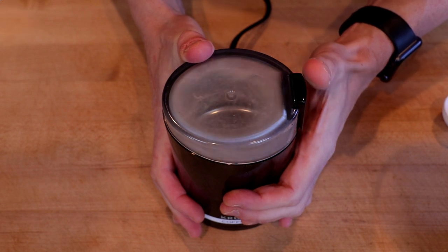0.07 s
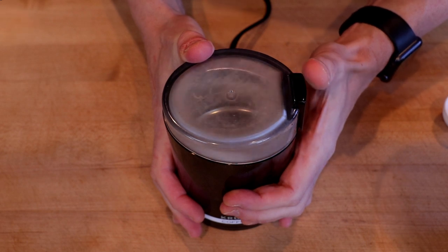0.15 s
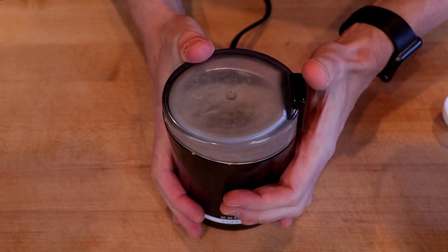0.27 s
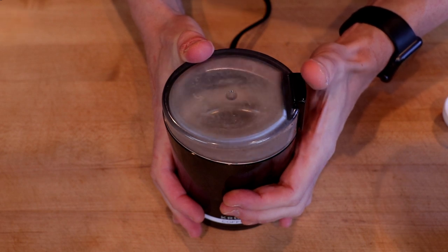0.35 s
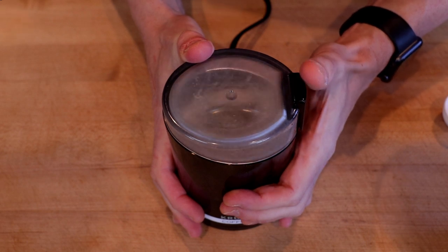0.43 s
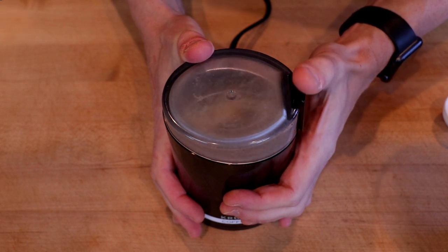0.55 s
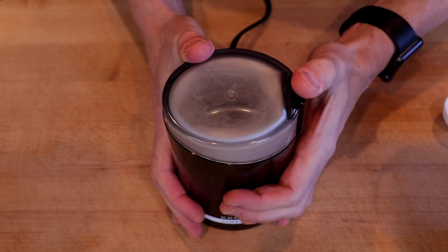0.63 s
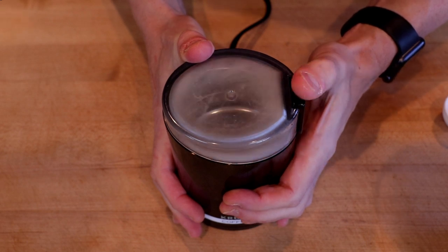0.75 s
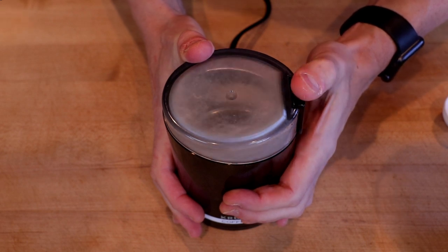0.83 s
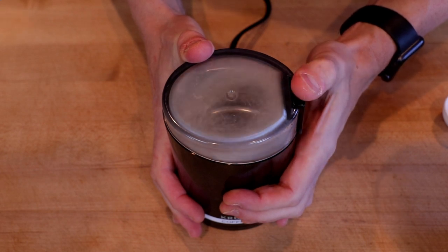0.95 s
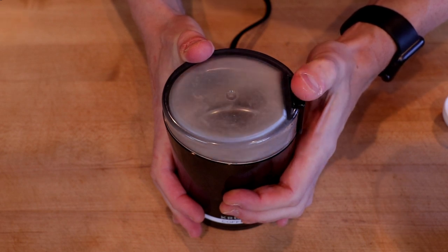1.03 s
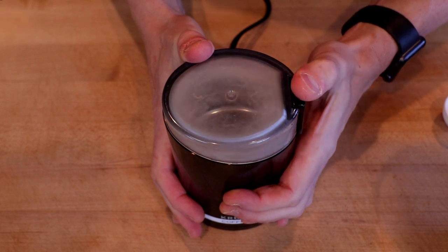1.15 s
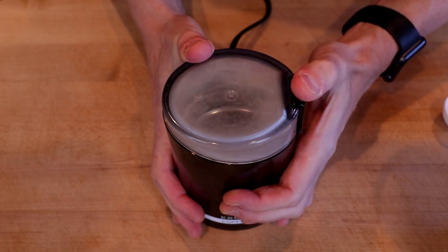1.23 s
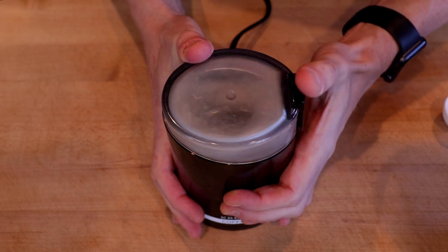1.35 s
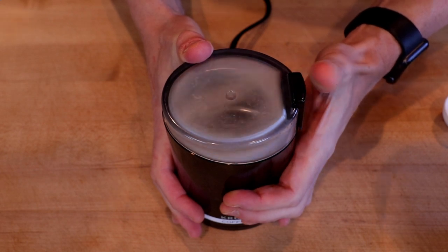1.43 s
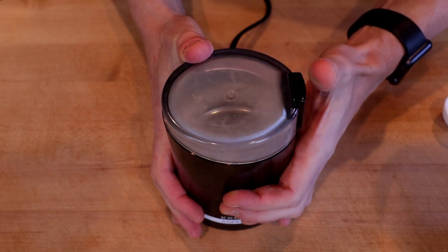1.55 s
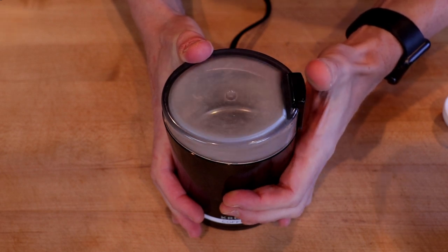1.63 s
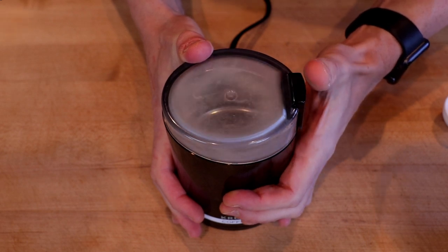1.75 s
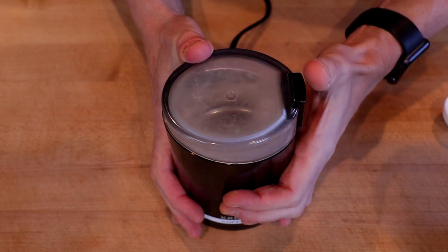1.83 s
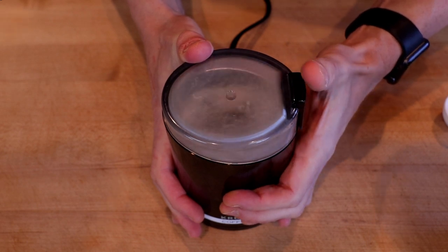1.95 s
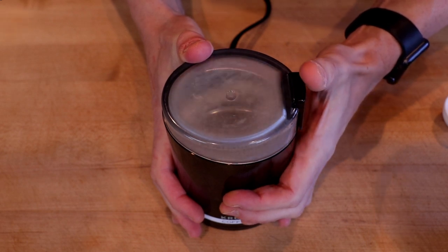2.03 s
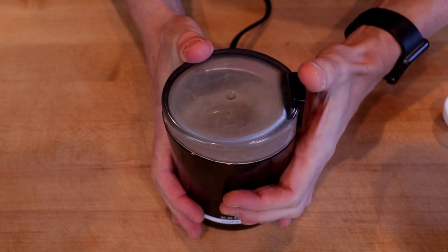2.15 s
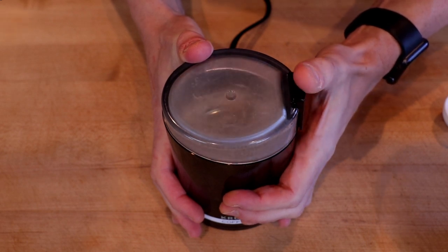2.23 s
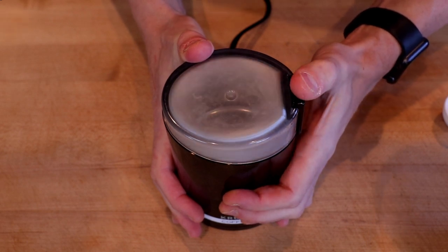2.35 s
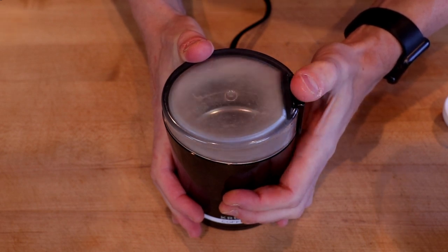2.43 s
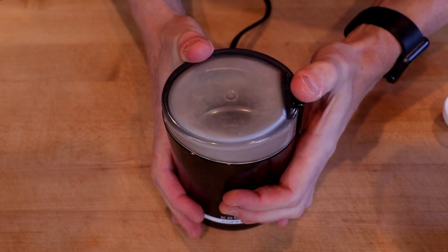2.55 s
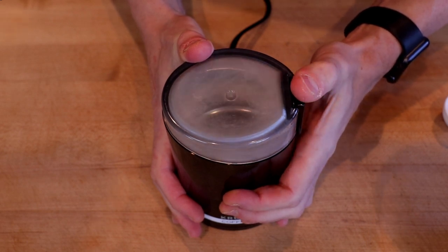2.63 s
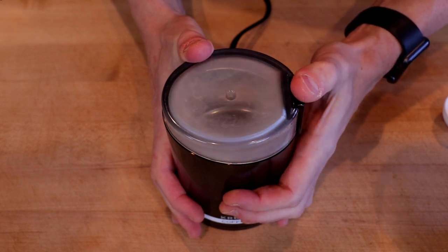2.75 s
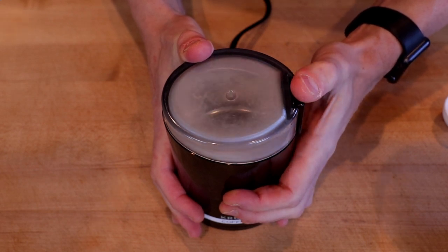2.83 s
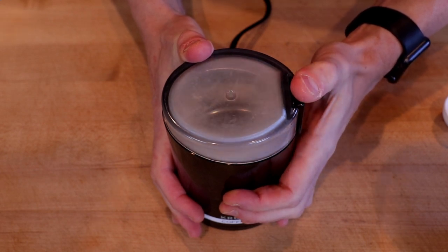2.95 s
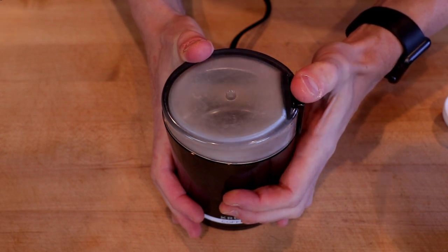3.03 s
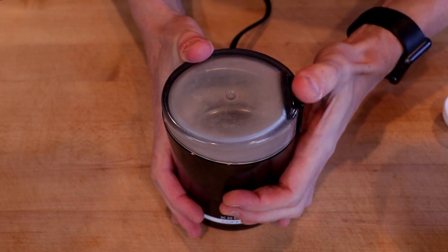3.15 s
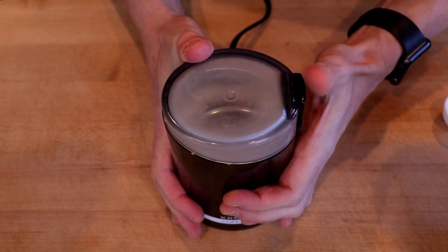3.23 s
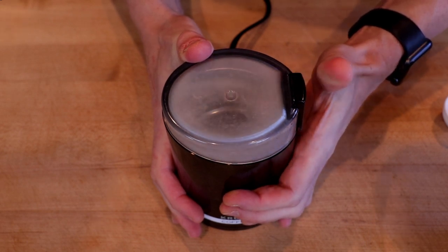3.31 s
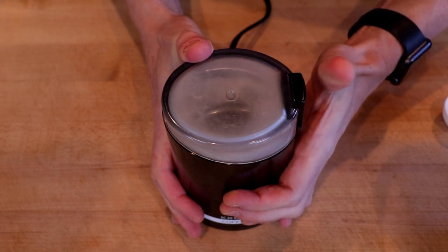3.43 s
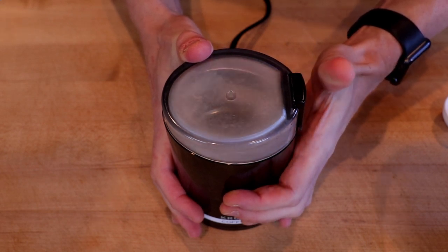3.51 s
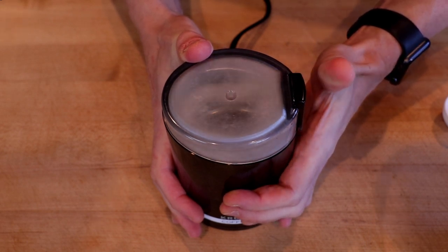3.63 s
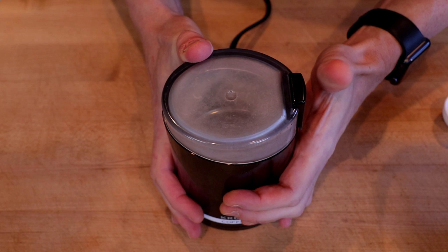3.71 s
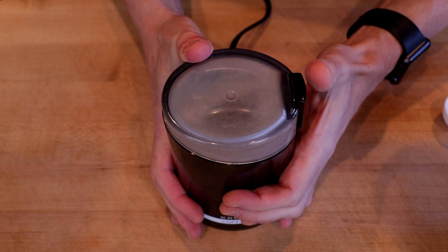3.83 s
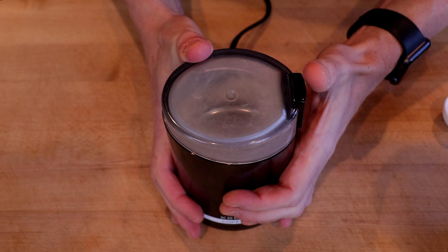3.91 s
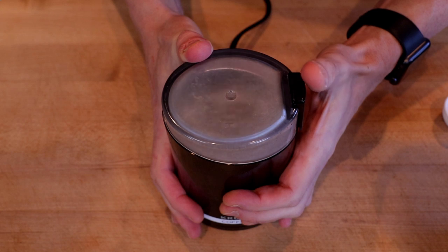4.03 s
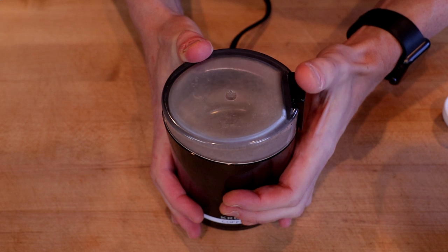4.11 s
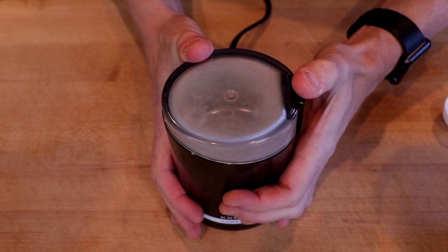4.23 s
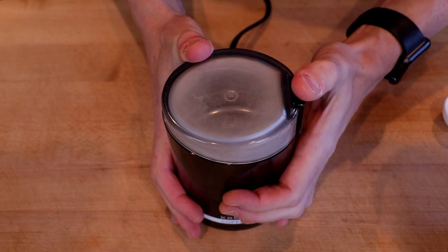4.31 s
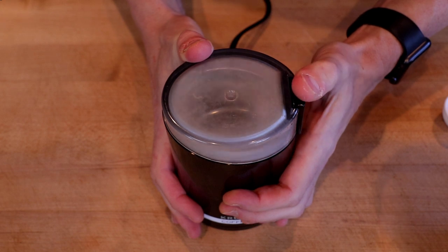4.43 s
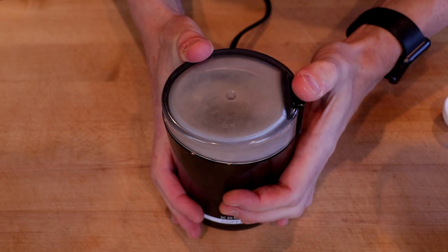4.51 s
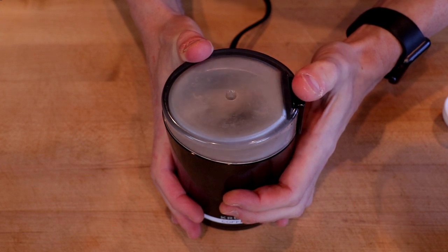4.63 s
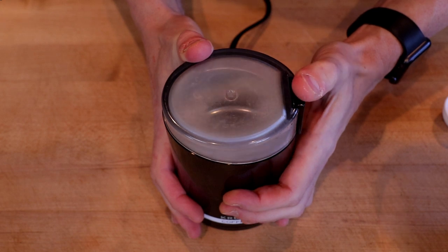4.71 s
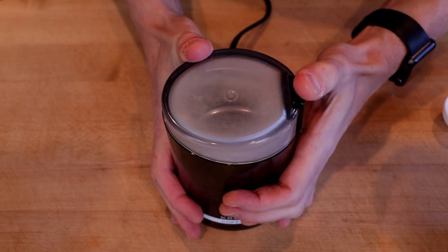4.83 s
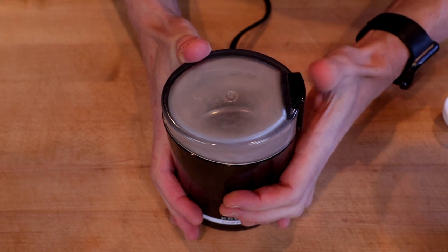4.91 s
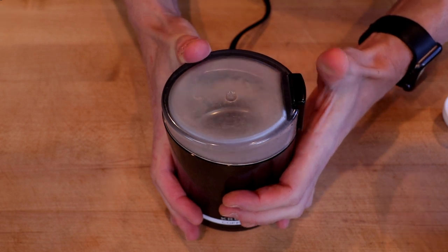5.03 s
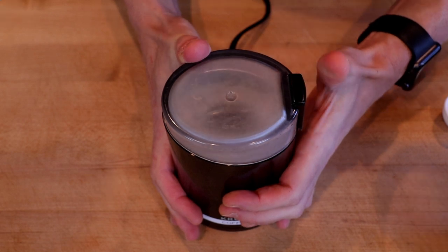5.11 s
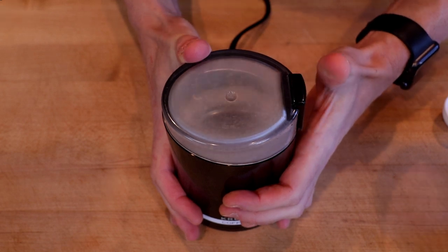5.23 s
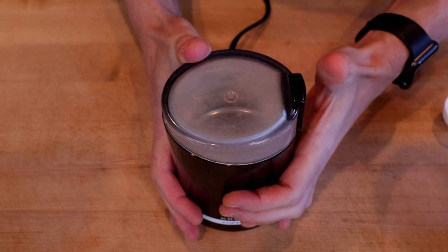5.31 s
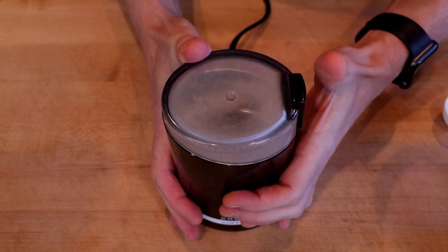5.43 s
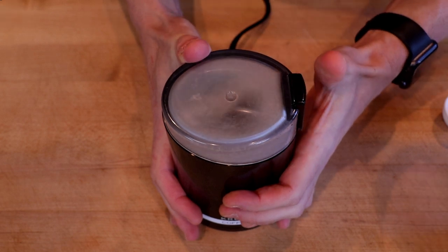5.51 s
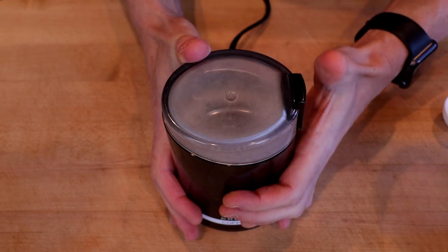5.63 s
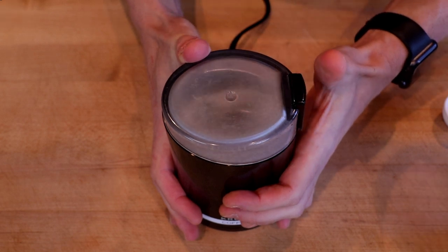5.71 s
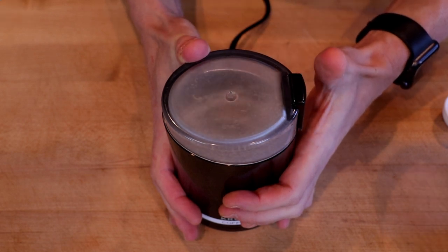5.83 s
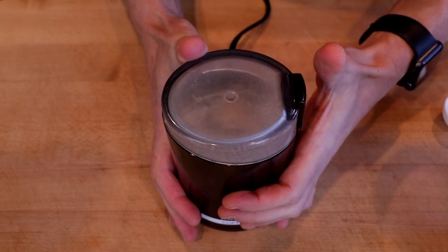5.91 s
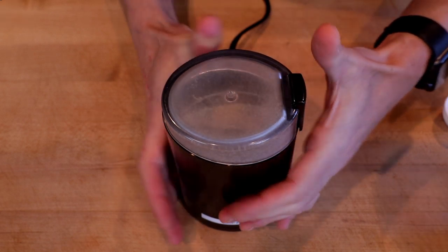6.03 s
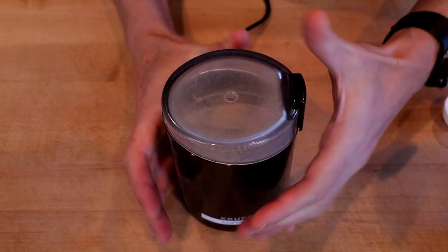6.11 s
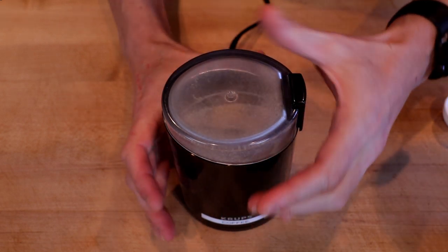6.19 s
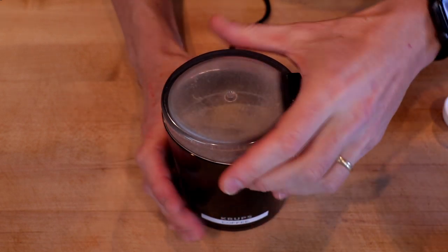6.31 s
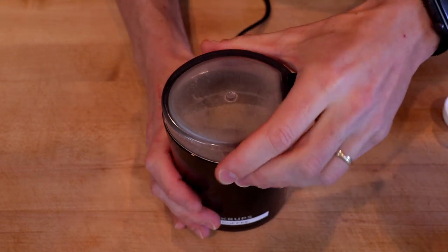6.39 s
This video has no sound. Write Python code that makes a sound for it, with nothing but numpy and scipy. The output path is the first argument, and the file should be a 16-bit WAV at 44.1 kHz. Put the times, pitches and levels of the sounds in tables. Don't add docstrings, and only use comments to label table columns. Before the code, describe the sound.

Close microphone in a quiet kitchen: a small blade grinder coasts down, then is pulsed three times. Each press clicks, the motor whines quickly upward, and hard grains of rice spray against steel, cup and plastic lid. Between presses the pitch slides down and the rattle thins. Finally single grains tick to rest, and a hand knocks the lid with a plastic rattle and faint squeak.

```python
import sys
import numpy as np
from scipy import signal
from scipy.fft import rfft, irfft, next_fast_len
from scipy.io import wavfile
from scipy.ndimage import uniform_filter1d, map_coordinates

SR = 44100
rng = np.random.default_rng(int(sys.argv[2]) if len(sys.argv) > 2 else 0)


def transcribe(signal):
    frames = np.atleast_2d(signal).T
    limited = np.clip(frames, -1, 1)
    pcm = np.round(limited * 32767).astype(np.int16)
    wavfile.write(sys.argv[1], SR, pcm)


def elevation(decibels):
    levels = np.asarray(decibels, float)
    return 10 ** (levels / 20)


N = 284687


def unit(x):
    return x / np.sqrt(np.mean(x ** 2) + 1e-20)


def along(points, hz):
    f, v = np.transpose(points)
    return np.interp(np.log(hz + 1), np.log(f + 1), v)


def curves(rows):
    start_s, *columns = np.transpose(rows)
    return [np.interp(np.arange(N) / SR, start_s, column) for column in columns]


def wobble(rate):
    knots = rng.standard_normal(int(N * rate / SR) + 4)
    return map_coordinates(knots, [np.arange(N) * rate / SR])


def swells(events):
    t = np.arange(N) / SR
    return sum(db * np.exp(-.5 * ((t - s) / length) ** 2) for s, length, db in events)


def bursts(events, rise, fall):
    t = np.arange(SR // 10) / SR
    marks = np.zeros(N)
    for s, db in events:
        marks[round(s * SR)] += elevation(db)
    return signal.fftconvolve(marks, (1 - np.exp(-t / rise)) * np.exp(-t / fall))[:N]


def filtered(x, response):
    m = next_fast_len(N + SR // 2)
    return irfft(rfft(x, m) * response(np.fft.rfftfreq(m, 1 / SR)), m)[..., :N]


def coloured(x, spectrum):
    return filtered(x, lambda hz: elevation(along(spectrum, hz)))


def ringing(x, modes):
    def response(f):
        total = 0
        for k, (centre, width, db) in enumerate(modes):
            damping = 1j * f * width
            total = total + (-1) ** k * elevation(db) * damping / (centre * centre - f * f + damping)
        return total
    return filtered(x, response)


# pitch_hz, level_db [dB per Hz]
AIR_COLOUR = [(15, -38), (25, -3.5), (42, -11), (55, -13.5), (125, -10.5), (374, -22.5), (415, -14.5),
              (552, -26.5), (774, -23.5), (1970, -26), (12500, -38), (16200, -68.5), (22000, -120)]


def air():
    top_hz = 12900
    noise = rng.standard_normal(N)
    return elevation(-80) * unit(filtered(noise, lambda hz: elevation(along(AIR_COLOUR, hz)) * (hz < top_hz)))


# pitch_hz, fade_s [time to fall 60 dB]
ROOM_FADE = [(200, 0.26), (2000, 0.36), (12000, 0.095)]


def kitchen(x):
    hz, t, z = signal.stft(rng.standard_normal(SR // 2), SR, nperseg=256)
    fade_db = -60 * t / along(ROOM_FADE, hz)[:, None]
    tail = signal.istft(z * elevation(fade_db), SR, nperseg=256)[1]
    delayed = np.pad(x, (200, 0))
    return signal.fftconvolve(delayed, tail / np.linalg.norm(tail))[:N]


# start_s, pitch_hz, level_db
FINGER_SLIDE = [
    (6.34, 8800, -95),
    (6.38, 10300, -82),
    (6.41, 11800, -89),
    (6.43, 12700, -83),
    (6.455, 13600, -83),
]


def squeak():
    hz, db = curves(FINGER_SLIDE)
    sliding = np.arange(N) / SR > FINGER_SLIDE[0][0]
    return elevation(db + 3 * wobble(150)) * sliding * np.sin(2 * np.pi * np.cumsum(hz) / SR)


# start_s, peak_db, thud_db, tick_db
LID_KNOCKS = [
    (6.065, -60, -32, -10),
    (6.123, -61, -34, -20),
    (6.323, -57, -19, -8),
    (6.329, -32, -40, 5),
    (6.344, -51, -17, -8),
    (6.381, -46, -11, -30),
    (6.393, -51.5, -10, -20),
    (6.431, -41.5, -20.5, -16),
    (6.443, -39, -25, -26),
]
# start_s, level_db
FINGER_RUSTLE = [
    (6.32, -100),
    (6.335, -72),
    (6.38, -72),
    (6.42, -71.5),
    (6.435, -65),
    (6.46, -69),
]
# pitch_hz, width_hz, level_db
SHELL_MODES = [(1386, 100, -1), (2080, 110, 2), (3020, 210, -15)]
# pitch_hz, width_hz, level_db
BASE_MODES = [(331, 26, 5), (532, 150, 1.5)]
# pitch_hz, width_hz, level_db
LATCH_MODES = [(5700, 480, 4.5), (4200, 1200, -6), (7300, 1100, -16.5), (10300, 1300, -13),
               (14500, 1500, -23)]


def hand():
    noise = rng.standard_normal((4, N))
    shell = bursts([(s, db) for s, db, _, _ in LID_KNOCKS], rise=0.0005, fall=0.0039)
    base = bursts([(s, db + thud_db) for s, db, thud_db, _ in LID_KNOCKS], rise=0.00077, fall=0.0066)
    latch = bursts([(s, db + tick_db) for s, db, _, tick_db in LID_KNOCKS], rise=0.0003, fall=0.0015)
    rustle = elevation(curves(FINGER_RUSTLE)[0] + 2.8 * wobble(60)) * noise[3]
    shell_sound = elevation(11) * ringing(shell * noise[0] + rustle, SHELL_MODES)
    base_sound = elevation(25.5) * ringing(base * noise[1], BASE_MODES)
    latch_sound = elevation(2.5) * ringing(latch * noise[2] + rustle, LATCH_MODES)
    return shell_sound + base_sound + latch_sound


# start_s, peak_db
THUMB = [
    (0.61, -50.5),
    (1.361, -47),
    (1.75, -64),
    (2.295, -48),
    (3.207, -37),
    (4.209, -55.5),
    (4.439, -72.5),
    (4.858, -46.5),
]
# start_s, peak_db
PALMS = [
    (0.439, -59),
    (2.209, -62),
    (6.13, -74),
    (6.389, -51),
]
# start_s, peak_db
CONTACTS = [
    (1.361, -30),
    (2.2958, -19),
    (3.2075, -20),
    (4.86, -26),
]


def switch():
    push = bursts(THUMB + PALMS, rise=0.0006, fall=0.0013)
    snap = bursts(CONTACTS, rise=0.00001, fall=0.00005)
    return elevation(10) * filtered(push, lambda f: (1j * f / (60 + 1j * f)) ** 2) - 2.1 * snap


# on_s, off_s, free_running_hz [shaft], friction_hz_per_s, rice_db
PRESSES = [
    (-1.1, -0.32, 420, 270, -25),
    (0.608, 1.345, 419, 225, -27),
    (2.308, 3.205, 430, 220, -29.5),
    (4.2, 4.877, 427, 228, -31),
]


def shaft():
    quick_s, slow_s, quick_share = 0.047, 0.198, 0.52
    drag_s = 0.99
    t, state = np.arange(N) / SR, np.zeros((3, N))
    for on, off, top_hz, friction, db in PRESSES:
        held, free, drag = np.clip(t, on, off) - on, np.maximum(t - off, 0), friction * drag_s
        lag = quick_share * np.exp(-held / quick_s) + (1 - quick_share) * np.exp(-held / slow_s)
        speed = (top_hz * (1 - lag) + drag) * np.exp(-free / drag_s) - drag
        state = np.where(t >= on, [speed, friction + 0 * t, db + 0 * t], state)
    hz, friction, rice_db = state
    turning = np.maximum(hz, 0)
    gain = np.clip(np.gradient(turning) * SR, 0, None)
    rest = np.maximum(-hz, 0) / friction
    return turning, uniform_filter1d(gain, size=300), rest, rice_db


# shaft_hz, level_db
ONCE_A_TURN = [(75, -95), (105, -70), (130, -67), (165, -69), (200, -58), (300, -51), (380, -45),
               (430, -40.5)]
# shaft_hz, level_db
TWICE_A_TURN = [(70, -90), (95, -69), (135, -82), (180, -74), (250, -64), (300, -62), (350, -47.5),
                (420, -39.8)]
# multiple, level_db, shell_resonance_hz, width_hz, coasting_change_db
HIGHER = [(3, -35.5, 1340, 70, -4), (4, -50, 1440, 280, -3), (5, -42.5, 2060, 180, -2)]
# multiple, level_db, shell_resonance_hz, width_hz, coasting_change_db
WEAKER = [(6, -60, 2520, 200, -12), (7, -61, 2980, 150, -12), (8, -53, 2700, 380, -14)]


def motor():
    t = np.arange(N) / SR
    held = sum(np.clip(np.minimum(t - on, off - t) / 0.02, 0, 1) for on, off, *_ in PRESSES)
    coasting = 1 - uniform_filter1d(held, size=2000)
    hz = uniform_filter1d(shaft()[0], size=900)
    turn = 2 * np.pi * np.cumsum(hz * (1 + 0.0022 * wobble(30))) / SR
    lurch_db = swells([(off, 0.045, 4) for _, off, *_ in PRESSES])
    levels = [(1, along(ONCE_A_TURN, hz) + lurch_db), (2, along(TWICE_A_TURN, hz) - 3 * coasting)]
    slow_loss_db = 22 * np.clip(1 - hz / 200, 0, 1)
    for k, db, centre, width, coast_db in HIGHER + WEAKER:
        off_peak_db = 16 * np.log10(1 + ((k * hz - centre) / width) ** 2)
        levels.append((k, db - off_peak_db + coast_db * coasting - slow_loss_db))
    tones = 0
    for k, db in levels:
        unsteady_db = (0.07 + 0.43 * k) * wobble(50)
        tones = tones + elevation(db + unsteady_db) * np.sin(k * turn + k * k)
    spinning = np.clip((hz - 55) / 30, 0, 1)
    hum = elevation(-77 + 1.5 * wobble(8)) * held * np.sin(2 * np.pi * 120 * t)
    return np.sqrt(2) * spinning * tones + hum


def grains(density, spread_db, life):
    chance, size, noise = rng.random(N), rng.exponential(1, N), rng.standard_normal(N)
    power = (chance < density / SR) * elevation(2 * spread_db * size)
    envelope = np.sqrt(signal.lfilter([1], [1, -np.exp(-1 / (life * SR))], power))
    return unit(envelope * noise)


def patchy(x, depth_db):
    z = signal.stft(x, nperseg=256)[2]
    field = uniform_filter1d(rng.standard_normal(z.shape), size=12, axis=0)
    field = uniform_filter1d(field, size=5, axis=1)
    return unit(signal.istft(z * elevation(depth_db * unit(field)), nperseg=256)[1][:N])


def scattered(count):
    when, size = rng.random((count, 2)).T
    return np.transpose([when * (N - 1) / SR, 5.5 - 1.3 * np.log(1 - size)])


# pitch_hz, width_hz, level_db
CUP_MODES = [(526, 60, -6), (619, 62, -3), (726, 68, -0.5), (818, 55, 0), (885, 40, 0), (936, 25, -3.5)]


def drum(drive, shaft_hz):
    favoured_hz = 700 + 1.15 * shaft_hz
    total = 0
    for mode in CUP_MODES:
        favour_db = 6 * np.exp(-.5 * ((mode[0] - favoured_hz) / 90) ** 2)
        level = elevation(3 * wobble(6) + favour_db)
        hits = grains(density=450, spread_db=1.64, life=0.0023)
        total = total + ringing(drive * level * hits, [mode])
    return total


# stirring_hz, level_db
STIRRING = [(0, -34), (15, -27), (40, -20), (80, -11), (170, -4.5), (300, -1.5), (420, 0)]
# shaft_hz, level_db
TUMBLING = [(0, -84), (15, -71), (50, -59.5), (110, -53.5), (200, -55.5), (300, -58), (420, -58)]
# after_switch_on_s, length_s, change_db
SWEEP_UP = [
    (0.03, 0.025, 1.5),
    (0.115, 0.035, -2.5),
]
# start_s, length_s, change_db
HEAP_SURGES = [(0.204, 0.01, 5.2), (0.385, 0.01, -5.7), (0.458, 0.022, 5.7), (0.658, 0.015, 5.5),
               (0.88, 0.01, -5.7), (1.195, 0.01, -7.1), (1.474, 0.06, -3.7), (1.991, 0.035, -3.4),
               (2.449, 0.035, -4.8), (2.524, 0.015, 6.0), (2.569, 0.01, -6.0), (2.655, 0.01, -14.1),
               (2.726, 0.01, 7.1), (2.764, 0.01, -6.2), (2.805, 0.015, 5.0), (3.161, 0.06, -2.5),
               (3.347, 0.015, 4.2), (3.417, 0.015, 5.2), (3.608, 0.01, 5.3), (3.796, 0.015, -8.5),
               (4.063, 0.015, -4.8), (4.404, 0.06, 4.3), (4.705, 0.022, -6.3), (4.796, 0.01, 7.2),
               (5.215, 0.022, -5.4), (5.29, 0.015, 5.8), (5.426, 0.015, 8.0), (5.522, 0.01, 6.6),
               (5.603, 0.01, -7.3), (5.83, 0.01, 6.3)]
# start_s, length_s, change_db
CUP_ROLLS = [(0.388, 0.026, -10.5), (0.571, 0.012, -5.2), (0.603, 0.012, 8.6), (0.633, 0.012, -5.6),
             (0.683, 0.012, 9.0), (1.769, 0.012, 11.4), (1.823, 0.012, 7.1), (1.878, 0.018, -5.8),
             (2.054, 0.026, -3.5), (2.188, 0.012, -6.1), (2.29, 0.04, 6.3), (3.608, 0.018, 11.3),
             (3.905, 0.026, -7.4), (4.018, 0.026, 7.1), (4.048, 0.12, -9.3), (4.159, 0.012, -7.1),
             (5.218, 0.012, -5.7), (5.356, 0.018, -7.7), (5.449, 0.012, 5.8), (5.515, 0.012, 12.5),
             (5.678, 0.07, -9.6), (5.698, 0.012, -5.2), (5.728, 0.012, 6.2), (5.837, 0.012, 7.0)]
# start_s, length_s, change_db
LID_RAPS = [(0.05, 0.018, 5.8), (0.204, 0.018, -6.0), (0.696, 0.026, -7.2), (0.819, 0.026, 5.7),
            (1.562, 0.07, 3.9), (1.814, 0.07, -2.5), (1.95, 0.012, 5.5), (2.084, 0.12, 3.1),
            (3.381, 0.012, 8.2), (3.472, 0.012, -6.3), (3.664, 0.012, -5.4), (3.868, 0.026, 4.5),
            (3.984, 0.012, -5.4), (4.107, 0.07, 4.6), (4.408, 0.07, -4.1), (4.961, 0.012, -8.0),
            (4.998, 0.012, 8.6), (5.381, 0.12, -3.5), (5.859, 0.012, -9.1), (5.912, 0.012, -5.3)]
# start_s, peak_db
HANDFULS = [(0.1491, -12), (0.2598, -16), (0.7124, -16), (0.7223, -11), (0.7397, -15), (0.7577, -15),
            (0.9213, -13), (0.9747, -12), (1.0331, -11), (1.0799, -12), (1.1404, -12), (1.1608, -12),
            (1.2296, -12), (1.3389, -14), (1.3763, -13), (1.7474, -13), (1.7978, -17), (2.2687, -27),
            (2.4418, -16), (2.4848, -16), (2.589, -14), (2.8105, -13), (3.0505, -14), (3.1951, -14),
            (3.2869, -15), (3.49, -14), (3.5633, -16), (4.3056, -17), (4.4857, -14), (4.8983, -16)]
# start_s, peak_db
LAST_GRAINS = [(5.6166, -43), (5.639, -41.5), (5.6545, -23), (5.6676, -30), (5.6897, -36.5), (5.6986, -43),
               (5.7327, -31), (5.765, -41), (5.8093, -52), (5.809, -42), (5.8515, -36), (5.895, -46),
               (5.9003, -35), (5.9117, -50), (5.9598, -68), (5.9794, -57), (6.0294, -60), (6.0495, -59),
               (6.0955, -62)]
# pitch_hz, level_db [dB per Hz]
FIRM_COLOUR = [(1470, -37), (2500, -11), (2920, -10.5), (3250, -19), (3560, -15), (4160, -6.5), (4740, -2),
               (5930, -2), (7310, -5.5), (9070, 2), (10500, -5.5), (12300, 3.5), (14200, -7.5),
               (15200, 0.5), (15800, -7.5)]
# pitch_hz, level_db [dB per Hz]
EASED_COLOUR = [(1470, -40), (2500, -15), (3220, -15.5), (4190, -0.5), (4740, -1), (5370, 0.5), (5800, -5),
                (6710, -5), (7770, -10.5), (9350, 0), (10800, -0.5), (12500, -12.5), (13800, 2.5),
                (14600, -2), (15800, -9.5)]
# start_s, eased_share [0 to 1]
GRIP = [
    (4.4, 0.067),
    (5.05, 0.95),
]
# pitch_hz, width_hz, level_db
LID_MODES = [(2045, 105, 2.5), (1835, 256, -7.5), (1400, 500, -14.5), (2580, 220, -19)]


def rice():
    hz, gain, rest, load_db = shaft()
    ease, = curves(GRIP)
    settle_db = 150 * rest
    stir_db = along(STIRRING, hz + 0.036 * gain) - settle_db
    sweeps = [(on + after, length, db) for on, *_ in PRESSES for after, length, db in SWEEP_UP]
    surge_db = swells(HEAP_SURGES) + swells(sweeps)
    flow = elevation(load_db + stir_db + surge_db)

    swirl = unit(elevation(0.6 * wobble(30) + 0.79 * wobble(100) + 1.3 * wobble(300)))
    swirl = swirl + bursts(scattered(count=110), rise=0.0005, fall=0.0016)
    throw = elevation(-0.5) * flow * swirl + elevation(-8) * bursts(LAST_GRAINS, rise=0.00044, fall=0.002)
    hits = patchy(grains(density=2200, spread_db=1.5, life=0.00055), depth_db=1.6)
    patter = (1 - ease) * unit(coloured(hits, FIRM_COLOUR)) + ease * unit(coloured(hits, EASED_COLOUR))

    cracks = elevation(-1.5) * bursts(HANDFULS, rise=0.00015, fall=0.0008)
    crack_noise = unit(coloured(rng.standard_normal(N), FIRM_COLOUR))

    surge = np.abs((throw + cracks) / (flow + 1e-5)) ** 0.62
    lid_db = load_db - 10.8 + 0.82 * stir_db + 0.9 * surge_db + swells(LID_RAPS) - 0.6 * settle_db
    lid = ringing(elevation(lid_db) * surge * grains(density=1300, spread_db=1.5, life=0.0014), LID_MODES)

    jolt_db = 5 * gain / gain.max()
    cup_db = along(TUMBLING, hz) + jolt_db - settle_db + swells(CUP_ROLLS) + 1.5 * wobble(12)
    cup = ringing(drum(elevation(cup_db) * surge, hz), [(700, 760, -1.8)])
    cup = ringing(cup, [(780, 600, 0.8)])

    body = flow * ringing(hits, [(312, 300, 8), (520, 180, 23)])
    steel = throw * patter + cracks * crack_noise
    return steel + elevation(19) * lid + elevation(-37.5) * body + elevation(24) * cup


def scene():
    near = motor() + rice() + switch() + hand() + squeak()
    return (near + elevation(-15) * kitchen(near) + air())[None]


def band_limit(x):
    return signal.sosfilt(signal.butter(12, 17120, fs=SR, output="sos"), x)


def record(dry):
    top_hz, low_hz = 16050, 30
    mix = filtered(dry, lambda hz: np.clip((top_hz - hz) / 250, 0, 1) ** 2 * hz / np.hypot(hz, low_hz))
    return band_limit(mix)


dry = scene()
out = record(dry)
transcribe(out)
```